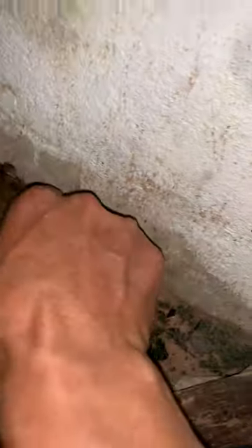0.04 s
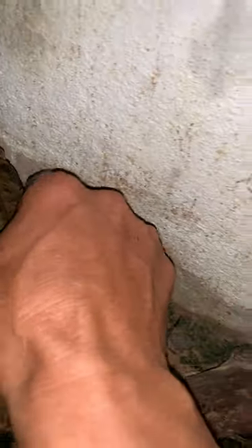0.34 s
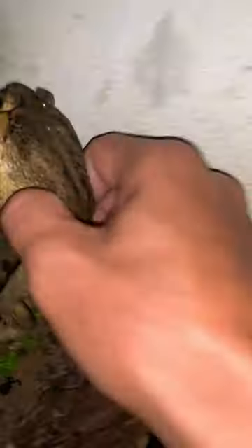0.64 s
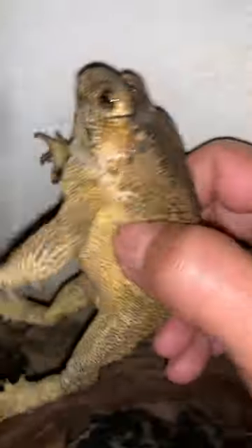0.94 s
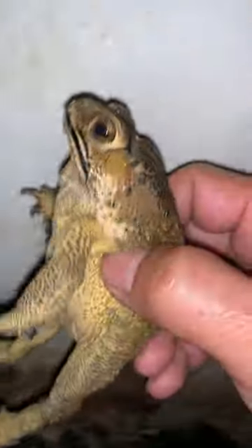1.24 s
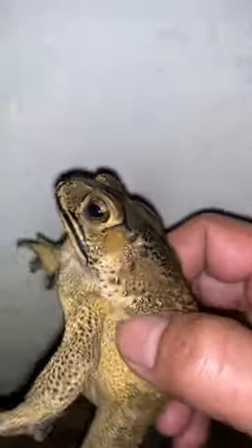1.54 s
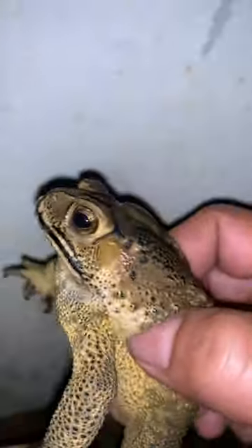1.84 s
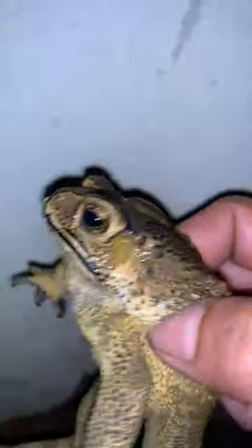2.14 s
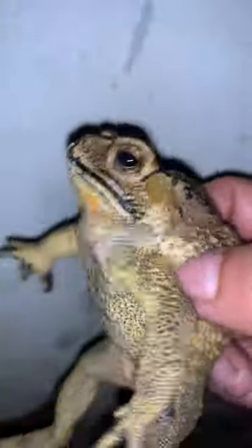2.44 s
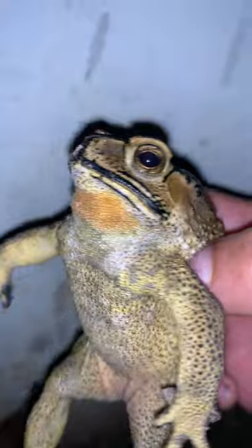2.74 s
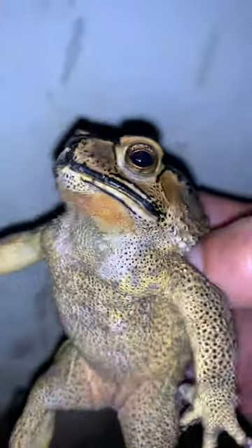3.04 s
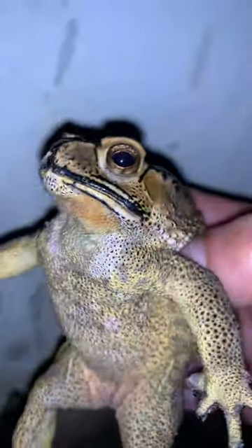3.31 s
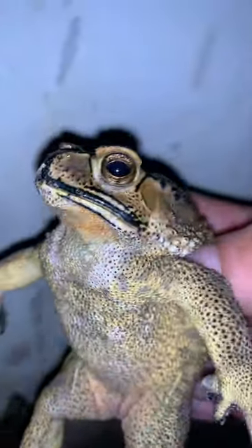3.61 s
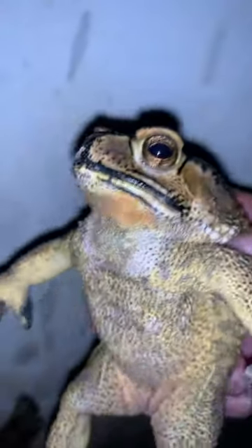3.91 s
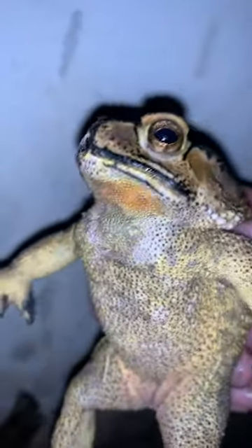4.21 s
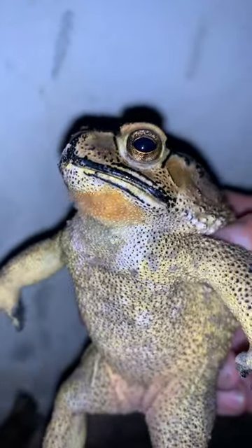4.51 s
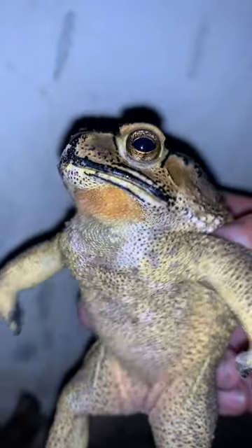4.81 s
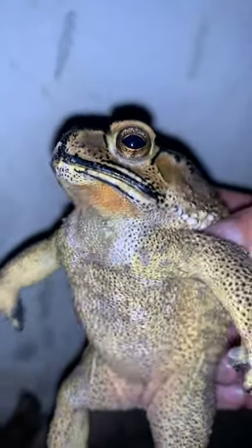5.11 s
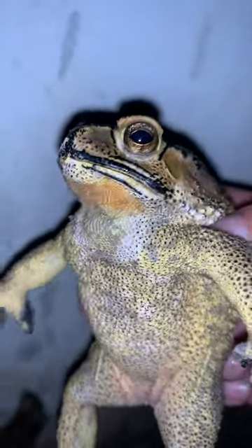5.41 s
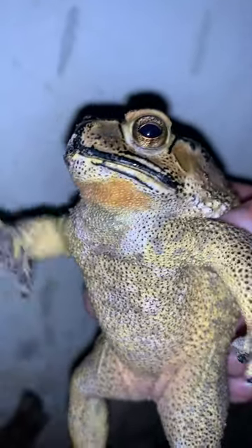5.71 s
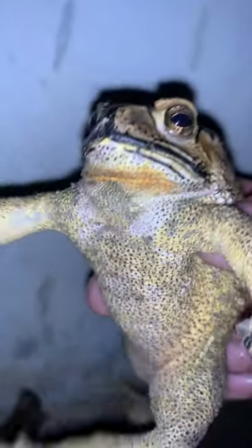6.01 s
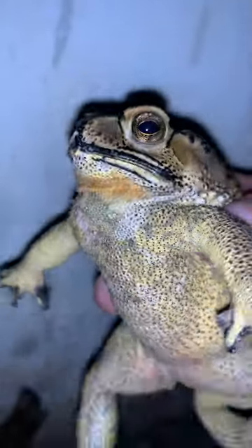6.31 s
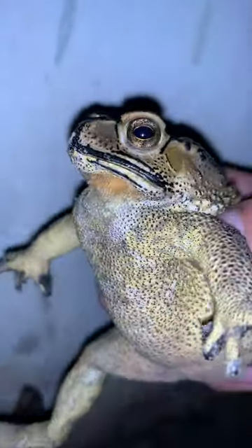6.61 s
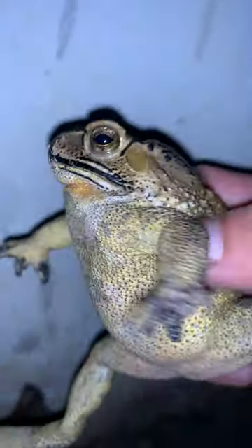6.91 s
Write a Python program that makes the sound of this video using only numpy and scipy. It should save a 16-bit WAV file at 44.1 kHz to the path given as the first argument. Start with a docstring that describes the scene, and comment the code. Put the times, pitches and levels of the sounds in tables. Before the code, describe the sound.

Quick, popping clucks from a hand-held toad grow louder, then stop, with soft finger rubs, hiss and distant night insects.

```python
"""Short clucks, close to the microphone: the release calls of a toad held in the hand by a wall at night.
Each is one puff through the vocal cords: a pop, then a sagging tone near 1 kHz with its octave and a buzz.
Fingers rub and bump now and then. Far off, crickets trill and chirp with their wings
over steady hiss, a low rumble and an engine that draws nearer."""
import sys
import numpy as np
from scipy import signal
from scipy.fft import rfft, irfft, next_fast_len
from scipy.io import wavfile
from scipy.ndimage import uniform_filter1d, map_coordinates

SR = 44100
rng = np.random.default_rng(int(sys.argv[2]) if len(sys.argv) > 2 else 0)


def store_pcm(level_fs):
    """Save levels as 16-bit WAV."""
    pcm = np.round(np.clip(level_fs, -1, 1) * 32767).astype(np.int16)
    wavfile.write(sys.argv[1], SR, np.atleast_2d(pcm).T)


N = 315315
TIME = np.arange(N) / SR


def amp(db):
    """Decibels to gain."""
    return 10 ** (np.asarray(db) / 20)


def unit(x):
    """Scale to rms 1."""
    return x / np.sqrt(np.mean(x ** 2) + 1e-20)


def along(points, hz, column=1):
    """One column of a table read on a log-frequency axis."""
    table = np.transpose(points)
    return np.interp(np.log(hz + 1), np.log(table[0] + 1), table[column])


def wobble(rate):
    """A smooth random curve, rate knots a second."""
    return map_coordinates(rng.standard_normal(int(N * rate / SR) + 4), [TIME * rate])


def filtered(x, response):
    """x shaped by a response of frequency."""
    size = next_fast_len(N + SR // 2)
    return irfft(rfft(x, size) * response(np.fft.rfftfreq(size, 1 / SR)), size)[..., :N]


def noise(spectrum, channels=1):
    """Noise of rms 1 with the given colour."""
    white = rng.standard_normal((channels, N))
    return unit(filtered(white, lambda hz: amp(along(spectrum, hz))))


def band(centre_hz, width_hz, channels=1):
    """Noise of rms 1 in one steep resonance."""
    white = rng.standard_normal((channels, N))
    return unit(filtered(white, lambda hz: 1 / (1 + ((hz - centre_hz) / width_hz) ** 4)))


def whine(hz, waver_hz, rate):
    """A tone of rms 1 whose pitch wanders, rate times a second."""
    return np.sqrt(2) * np.sin(2 * np.pi * np.cumsum(hz + waver_hz * wobble(rate)) / SR)


# The engine's low note as it draws nearer: t/s, level/dB
ENGINE_APPROACH = [(0, -66), (4.1, -64), (4.4, -57.5), (5.75, -55.5), (5.95, -54), (6.5, -48), (7.15, -49)]
# Its higher lines at full strength: f/Hz, level/dB
ENGINE_LINES = [(100, -59), (170, -62)]

def far_engine(note_hz=58.6, lines_up_s=(4.4, 3.9)):
    """An engine in the distance: a low, nearly pure note with two faint higher lines."""
    level_db = np.interp(TIME, *np.transpose(ENGINE_APPROACH))
    lines = sum(amp(db) * whine(hz, .7, 5) for hz, db in ENGINE_LINES)
    return amp(level_db) * whine(note_hz, .8, 5) + np.interp(TIME, lines_up_s, [.5, 1]) * lines


# Rumble in the centre of the image: f/Hz, relative density/dB
RUMBLE_COLOUR = [(25, -24), (42, -8), (62, -4), (90, 0), (170, -2.5), (260, -9), (450, -11), (900, -85)]
# Steady centre hiss with a dip near 9.5 kHz: f/Hz, relative density/dB
MID_HISS_COLOUR = [(100, -57), (300, -29.5), (520, -8.5), (800, -14.5), (1200, -8), (1900, -9.5),
                   (2700, -12.5), (3700, -11), (4300, -17), (4900, -22.5), (6800, -14), (9500, -30.5),
                   (12500, -18.5), (13800, -25), (14600, -108)]
# Steady wide hiss with a dip near 13 kHz: f/Hz, relative density/dB
SIDE_HISS_COLOUR = [(25, -16), (90, 0.5), (250, 0), (330, 4.5), (600, 6.5), (1050, 8.5), (1800, 2),
                    (2500, 2), (3700, 3), (4300, -3.5), (5000, -2), (7500, -19), (9800, -7), (13000, -23.5),
                    (15500, -10)]

def background(mid_db=-49, side_db=-44.5, rumble_db=-50.5, wall_db=-56, wash_db=-58.5, rise_db_per_s=.17):
    """Wide, steady hiss over a central rumble and the far engine."""
    low = far_engine() + amp(rumble_db + .29 * wobble(13)) * noise(RUMBLE_COLOUR)
    # low down by the wall the rumble is fuller; a hollow wash opens up as the microphone rises from the wall
    sheltered = np.exp(-(TIME / .98) ** 2)
    low += amp(wall_db) * sheltered * band(200, 105) + amp(wash_db) * (1 - sheltered) * band(512, 148)
    mid = amp(mid_db) * noise(MID_HISS_COLOUR) + low
    side = amp(side_db + rise_db_per_s * (TIME - TIME.mean())) * noise(SIDE_HISS_COLOUR)
    return np.vstack([mid + side, mid - side])


def cricket(hz, width_hz, chirp_rate, chirp_s, sharpness, stroke_rate, direct, stroke_depth=.35, echo=.08):
    """Wing strokes grouped in chirps: part direct tone, the rest blurred to a narrow band by distance."""
    clock = TIME - chirp_s + .0012 * wobble(2.04)
    chirps = np.minimum(1.3 * np.abs(np.cos(np.pi * chirp_rate * clock)) ** sharpness, 1) + echo
    strokes = 1 + stroke_depth * np.cos(2 * np.pi * stroke_rate * clock)
    tone = np.sqrt(direct) * whine(hz, width_hz / 2, 2 * width_hz)
    blur = np.sqrt(1 - direct) * band(hz, width_hz, channels=2)
    return unit(chirps * strokes) * (tone + blur)


# One insect rasping in bouts: middle t/s, length/s, f/Hz, level/dB
RASP_BOUTS = [(0.95, 0.8, 3500, -51.5), (1.87, 0.57, 3440, -50.5), (2.95, 0.6, 3450, -57.5),
              (4.05, 0.84, 3480, -54), (5.15, 0.88, 3400, -54.5), (6.553, 0.67, 3450, -55.5)]
# Four far crickets: f/Hz, width/Hz, chirp rate/Hz, t/s of one chirp, sharpness, stroke rate/Hz,
# direct share 0-1, opening level/dB, closing level/dB
FAR_CRICKETS = [(4175, 155, 3.9, 3.575, 1.5, 76, .02, -55.5, -57),
                (7370, 70, 9.42, 6.025, 3.5, 47, .4, -63, -59.5),
                (6490, 70, 8.6, 6.04, 3.5, 55, .4, -69, -58), (6810, 110, 8.9, 6.02, 2.4, 50, .1, -63, -63)]

def insects(trill_db=-55.5, trill_joins_s=2.45, chorus_db=-59, bout_width_hz=165):
    """A far chorus, a rasping insect and four chirping crickets; a nearer, fast triller joins in."""
    trill = cricket(hz=3430, width_hz=90, chirp_rate=28.6, chirp_s=6.22, sharpness=1,
                    stroke_rate=114, direct=.45, stroke_depth=.25, echo=.3)
    chorus = amp(chorus_db) * band(3410, 105, channels=2)
    out = chorus + amp(trill_db) * (TIME >= trill_joins_s) * trill
    for s, length, hz, db in RASP_BOUTS:
        bout = np.exp(-(2 * (TIME - s) / length) ** 8)
        out += amp(db) * bout * band(hz, bout_width_hz, channels=2)
    for *song, opening_db, closing_db in FAR_CRICKETS:
        out += amp(np.linspace(opening_db, closing_db, N)) * cricket(*song)
    return out


# Fingers rubbing and bumping: t/s, half-length/s, thud level/dB, scuff level/dB, rustle level/dB
GRIP_SHIFTS = [(.008, 0.016, -30.5, -46, -62), (0.52, 0.033, -40, -55, -69), (0.792, 0.078, -56, -71, -69),
               (0.994, 0.045, -52, -60, -58), (1.874, 0.02, -49.5, -46, -43), (3.751, 0.026, -52, -43, -47),
               (5.554, 0.0042, -55, -39, -54), (5.564, 0.017, -54, -41.5, -42.5)]
# Dry rustle of skin: f/Hz, relative density/dB
RUSTLE_COLOUR = [(600, 2), (2000, -35), (4000, -1), (5000, 3), (7000, 11), (10000, -11), (15000, -30)]
# Tiny clicks of damp skin: t/s, level/dB
SKIN_TICKS = [(1.03, -40), (2.048, -44), (2.2825, -48)]

def handling(tick_s=.0012):
    """Close to the microphone, each shift of the grip thuds, scuffs and rustles; damp skin ticks."""
    thud, scuff, rustle = band(163, 65), band(400, 300), noise(RUSTLE_COLOUR, channels=2)
    out = np.zeros((2, N))
    for s, half_length, thud_db, scuff_db, rustle_db in GRIP_SHIFTS:
        stroke = np.exp(-2 * ((TIME - s) / half_length) ** 2)
        out += stroke * (amp(thud_db) * thud + amp(scuff_db) * scuff + amp(rustle_db) * rustle)
    ticks = sum(amp(db) * np.exp(-((TIME - s) / tick_s) ** 2) for s, db in SKIN_TICKS)
    return out + ticks * band(10000, 5100, channels=2)


# Decay of the sound beside the wall: f/Hz, t60/s
WALL_DECAY = [(300, 0.028), (1500, 0.21), (10000, 0.0081)]

def wall_echoes(x, early_db=-29, tail_db=-29):
    """Hand, ground and wall send a few weak echoes to the microphone, then a short, dull tail."""
    hz, t, spectra = signal.stft(rng.standard_normal((2, SR // 2)), SR, nperseg=256)
    decay = amp(-60 * t / along(WALL_DECAY, hz)[:, None])
    tail = signal.istft(spectra * decay, SR, nperseg=256)[1]
    response = amp(tail_db) * tail / np.linalg.norm(tail[0])
    delays = (rng.uniform(.002, .014, (2, 6)) * SR).astype(int)
    response[np.arange(2)[:, None], delays] += amp(early_db) * rng.choice([-1, 1], delays.shape)
    return signal.fftconvolve(x, response, axes=1)[:, :N]


def pulse(age):
    """A quick rise from age 0 to a peak of 1 at age 1, then a decay."""
    age = np.maximum(age, 0)
    return age ** 2 * np.exp(2 * (1 - age))


def throat_knock(t, hz=1250, ring_s=.0016, relative_db=-18, pan_db=-7, left_lead_rad=-2):
    """The short hollow ring of the throat as the cords part, louder on the right."""
    side = np.array([[.5], [-.5]])
    phase = 2 * np.pi * hz * t + side * left_lead_rad + rng.uniform(0, 2 * np.pi)
    return amp(relative_db + pan_db * side) * pulse(t / ring_s + .5) * np.sin(phase)


# The clucks' stereo image: f/Hz, left minus right level/dB, left lead/rad
CLUCK_IMAGE = [(1000, 4.3, -.95), (1750, -8.3, 0), (2000, -8.3, 0), (2800, 2, -2.2), (3800, 0, -1.1),
               (4700, -3, -2), (5700, 0, -1.7), (7000, 0, 0), (8600, 0, 1.6), (9600, 0, 3.1), (11800, 0, 6),
               (13000, 0, 6.6), (14000, 0, 9)]

def in_stereo(strength, phase, harmonic_hz, s, turn_s=(2.45, 2.95)):
    """A cluck's harmonics summed in stereo, each with its own left-right level and phase."""
    pan_db = along(CLUCK_IMAGE, harmonic_hz)
    lead = along(CLUCK_IMAGE, harmonic_hz, column=2)
    # the fundamental sits near the centre until the toad is turned in the hand
    turned = np.interp(s, turn_s, [0, 1])
    pan_db[0] *= (1 + turned) / 2
    lead[0] *= turned
    return np.array([np.sum(strength * amp(side * pan_db) * np.cos(phase + side * lead), axis=0)
                     for side in (.5, -.5)])


def cord_pitch(pitch_hz, s, progress, pop, since_pop, crest=.19, sag_ends=.88):
    """The pitch lifts a little with the pressure, falls as the air runs out and levels off."""
    sag = 1.7 * (np.minimum(progress, sag_ends) - crest) ** 2 - .2
    sag_scale = 73 + 19.6 * (s - 4)  # deeper as the toad keeps calling
    # the cords are tautest at the instant they part, then slacken for a moment
    taut = np.exp(-(since_pop / .0013) ** 2)
    slack = np.exp(-((since_pop - .0025) / .0013) ** 2)
    return np.abs(pitch_hz + 130 * pop * (taut - slack) - sag_scale * sag)


# Buzz of the vocal cords, from the third harmonic up: f/Hz, relative level/dB per harmonic
CORD_BUZZ = [(2800, -29), (3700, -24.5), (4000, -32), (4650, -26), (5100, -40.5), (5700, -37),
             (7500, -36.5), (8700, -34), (9600, -23.5), (10400, -41), (11500, -25), (12600, -27.5),
             (13600, -40)]

def cluck(t, s, length, pitch_hz, db, octave_db, pop, pop_lead, jitter, grit, rasp, octave_rise_db=4.5):
    """One puff of air through the vocal cords: a pop as they part, then a swelling tone that sags."""
    progress = np.clip(t / length, 0, 1)
    since_pop = t + pop_lead
    hz = cord_pitch(pitch_hz, s, progress, pop, since_pop)
    phase = 2 * np.pi * np.cumsum(hz * (1 + jitter)) / SR
    pressure = np.abs(np.sin(np.pi * progress ** .85))  # peaks a little before the middle
    opening = pop * pulse(since_pop / .0016 + 1)
    tone = np.hypot(pressure ** .8, opening)
    plateau = np.abs(np.sin(np.pi * progress)) ** .35
    octave = amp(octave_db + octave_rise_db * (progress - 1)) * np.hypot(plateau, opening)
    # the cords snap shut once a cycle; the highest harmonics need the most pressure
    k = np.arange(1, 16)[:, None]
    buzz = amp(along(CORD_BUZZ, k * hz)) * (pressure ** (.12 * k) + opening) * (-1.) ** k
    strength = np.vstack([tone * (1 + grit / 6), octave * (1 + grit / 3), buzz[2:] * (1 + grit)])
    # the throat cannot start or stop within less than about a cycle
    strength = uniform_filter1d(strength, size=50, axis=1)
    voiced = in_stereo(strength, k * phase, k * pitch_hz, s)
    return amp(db) * (voiced + np.sqrt(pop) * throat_knock(since_pop) + (pressure + opening) * rasp)


# The toad's clucks: t/s, length/s, f/Hz, level/dB, octave over the tone/dB, pop size 0-1, pop lead/s
RELEASE_CALLS = [(1.453, 0.0071, 1006.0, -31.8, -0.8, 0.31, 0.0004),
                 (1.9305, 0.011, 999.0, -23.2, 1.2, 0.08, 0.0),
                 (2.1151, 0.0144, 985.0, -20.2, -0.1, 0.05, -0.0004),
                 (2.2693, 0.0169, 964.0, -18.0, -3.1, 0.68, -0.003),
                 (2.4205, 0.0217, 934.0, -20.6, -2.4, 0.35, 0.0008),
                 (2.9642, 0.0213, 932.0, -16.4, -6.5, 0.64, -0.0012),
                 (3.1077, 0.0242, 957.0, -13.4, -7.7, 0.34, 0.0014),
                 (3.2507, 0.0211, 973.0, -12.4, -8.7, 0.34, -0.0024),
                 (3.3978, 0.0206, 912.0, -17.2, -6.2, 0.71, 0.0),
                 (3.5525, 0.0237, 912.0, -16.7, -6.6, 0.58, 0.0006),
                 (3.702, 0.0234, 926.0, -15.2, -6.4, 0.34, 0.0023),
                 (3.8578, 0.0209, 960.0, -12.4, -7.7, 0.24, 0.0013),
                 (4.0107, 0.021, 946.0, -13.7, -6.8, 0.37, -0.0),
                 (4.1585, 0.02, 971.0, -11.8, -8.7, 0.56, -0.0009),
                 (4.337, 0.0213, 945.0, -14.4, -7.1, 0.46, -0.0004),
                 (4.6453, 0.0173, 947.0, -13.5, -7.5, 0.05, 0.0002),
                 (4.8503, 0.0205, 954.0, -11.7, -8.5, 0.41, -0.002),
                 (5.013, 0.0207, 953.0, -12.0, -9.4, 0.54, 0.0015),
                 (5.1818, 0.0228, 951.0, -12.3, -9.1, 0.36, 0.0035),
                 (5.3532, 0.0239, 944.0, -13.1, -9.1, 0.48, 0.0035)]

def toad(pitch_jitter=.006, grit_depth=.22, rasp_relative_db=-44):
    """The toad in the hand, close up: series of clucks, each a little unsteady in pitch and strength."""
    voice = np.zeros((2, N))
    jitter, grit = pitch_jitter * wobble(1200), grit_depth * wobble(1500)
    rasp = amp(rasp_relative_db) * band(8950, 5500, channels=2)  # air hissing between the cords
    for s, *call in RELEASE_CALLS:
        span = slice(int((s - .01) * SR), int((s + .04) * SR))
        voice[:, span] += cluck(TIME[span] - s, s, *call, jitter[span], grit[span], rasp[:, span])
    return voice


def scene():
    """Toad and hand close to the microphone, the wall nearby, insects far off, over hiss and rumble."""
    calls = toad()
    return calls + wall_echoes(calls) + handling() + insects() + background()


def record(dry, top_hz=15800):
    """The recorder keeps nothing above its band limit."""
    return filtered(dry, lambda hz: hz < top_hz)


dry = scene()
out = record(dry)
store_pcm(out)
```